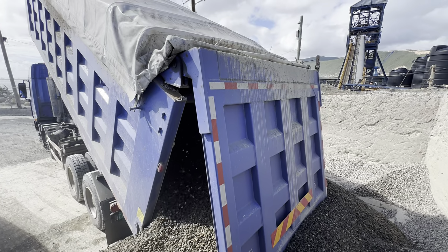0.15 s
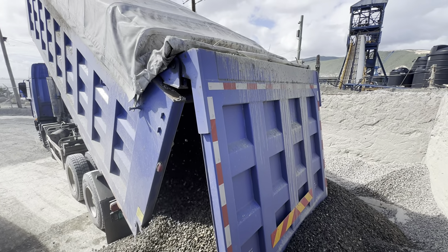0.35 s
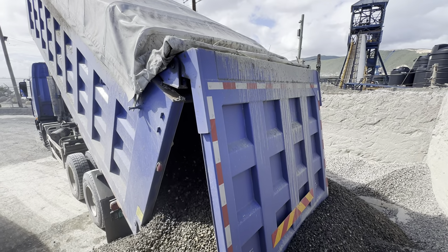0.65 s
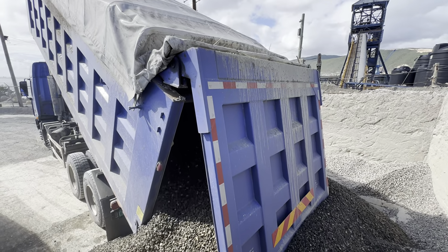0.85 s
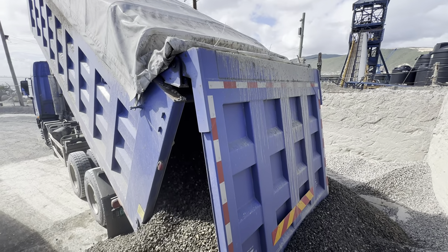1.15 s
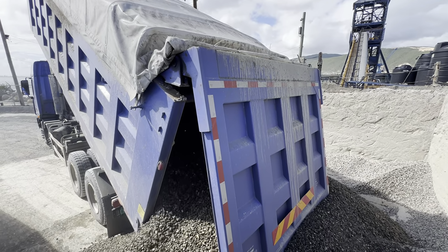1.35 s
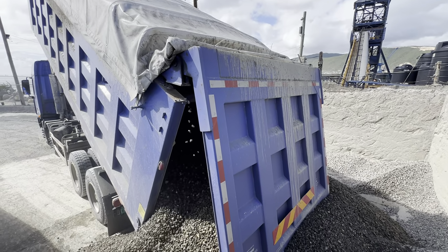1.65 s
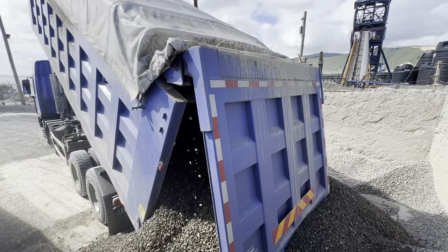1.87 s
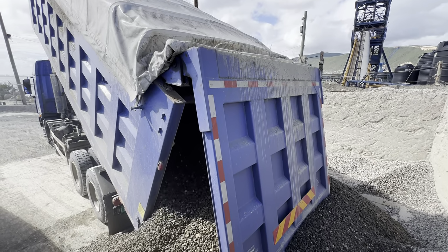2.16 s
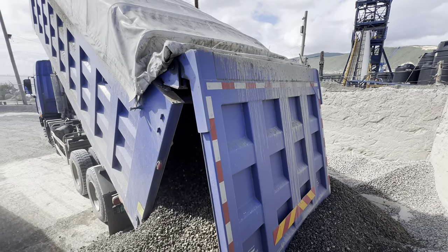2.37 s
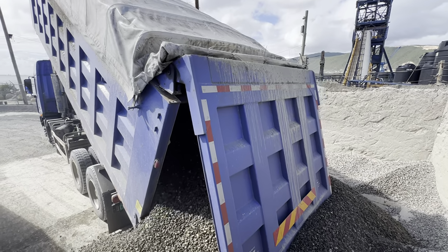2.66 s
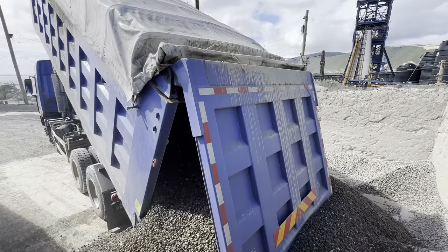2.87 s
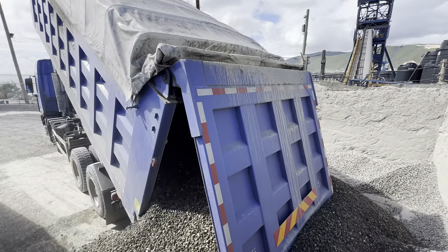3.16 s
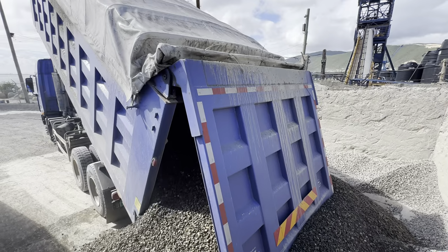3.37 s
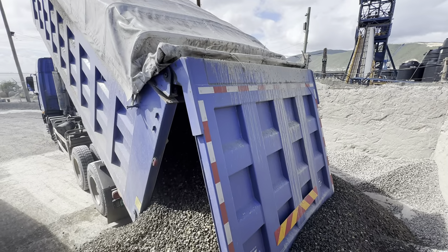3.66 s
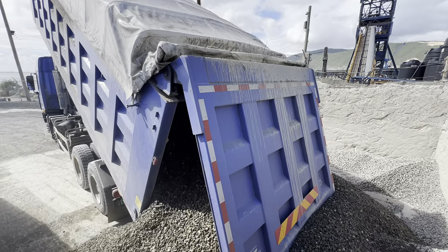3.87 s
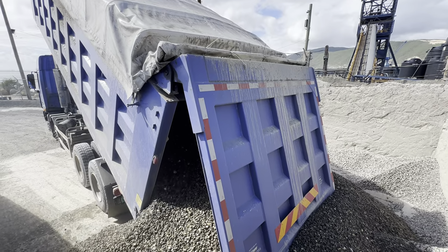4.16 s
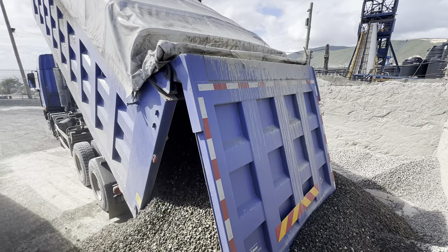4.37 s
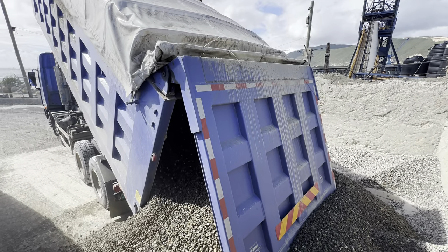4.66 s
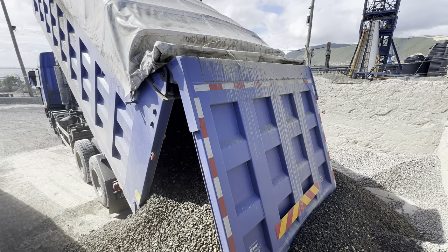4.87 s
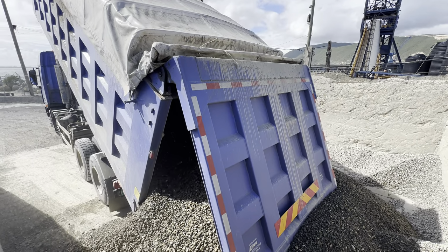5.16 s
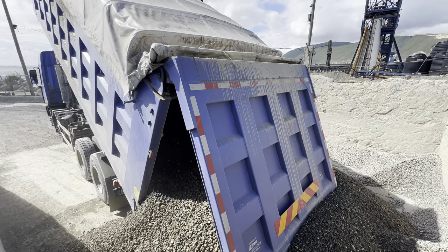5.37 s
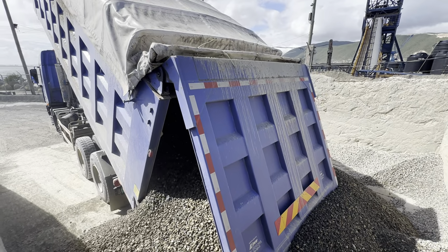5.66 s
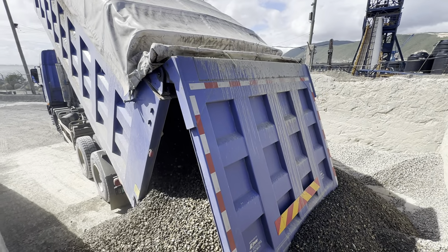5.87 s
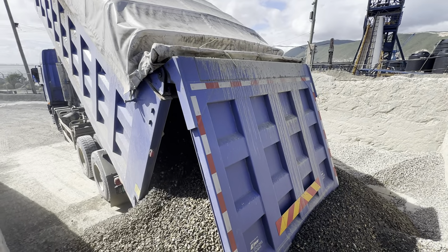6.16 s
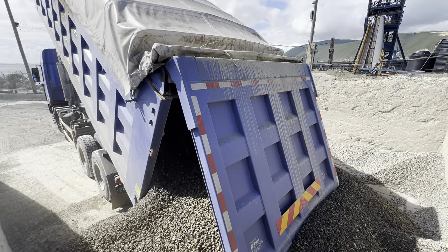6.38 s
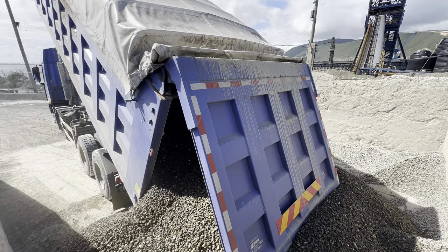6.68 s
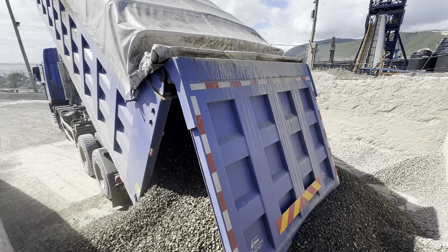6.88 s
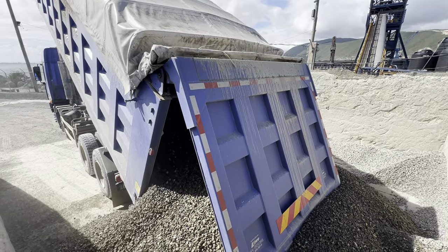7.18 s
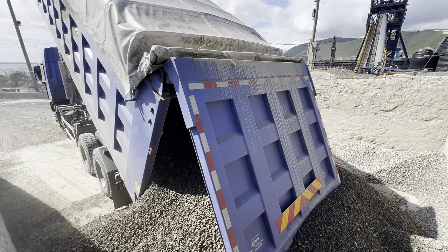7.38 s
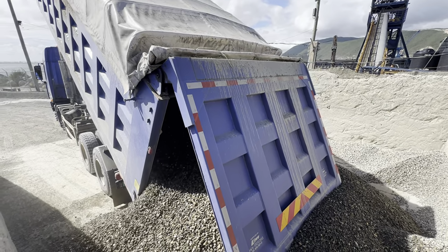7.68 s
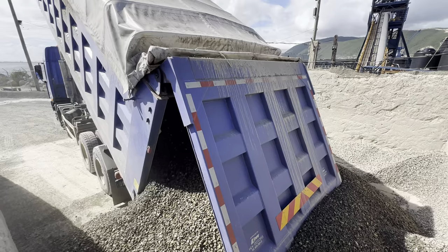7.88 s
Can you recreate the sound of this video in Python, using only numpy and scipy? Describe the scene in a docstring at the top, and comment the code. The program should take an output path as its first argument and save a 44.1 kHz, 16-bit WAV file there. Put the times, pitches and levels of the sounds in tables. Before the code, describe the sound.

Rough wind flutter, low thumps and sharp pops dominate, with a quieter gritty rush of gravel pouring from a steel tipper onto a heap.

```python
"""Gusty wind buffets the microphone: rough, crackling flutter, then a low thump, and single eddies crack sharply.
Behind it gravel slides out of a raised dump truck bed and rattles onto the heap under the open tailgate in an
open yard. Wind is shaped noise plus falling pressure jolts; gravel is dense random impacts, with gritty stone ticks
and pebble spatters. Stones knock on the steel bed, whose resonances drone faintly under the sliding load."""
import sys
import numpy as np
from scipy import signal
from scipy.fft import rfft, irfft, next_fast_len
from scipy.io import wavfile
from scipy.ndimage import uniform_filter1d, map_coordinates

SR = 44100
rng = np.random.default_rng(int(sys.argv[2]) if len(sys.argv) > 2 else 0)


def master_out(mix):
    """Clip the mix to full scale and print it as 16-bit PCM to the path in sys.argv[1]."""
    frames = np.transpose(np.atleast_2d(mix))
    ceiling = np.clip(frames, -1, 1)
    pcm = np.round(ceiling * 32767).astype(np.int16)
    wavfile.write(sys.argv[1], SR, pcm)


N = 354123
T = np.arange(N) / SR  # s

# Levels in the tables are relative; each source adds its own offset.
# steady breeze between gusts: t/s, strength/dB
BREEZE = [(0, -19.5), (.45, -21.5), (.63, -23), (1.08, -25), (1.3, -25.5), (1.6, -28), (1.84, -27.5),
          (2.07, -25.5), (2.52, -24), (2.69, -25.5), (3.1, -23), (3.26, -27), (3.43, -27), (4.3, -22),
          (4.66, -23.5), (4.94, -27), (5.26, -25.5), (5.49, -21), (6.45, -25.5), (6.74, -28), (7.1, -26),
          (7.28, -28), (7.57, -24.5), (8.03, -22.5)]
# gusts, each both flutters and rumbles: t/s, strength/dB, length/s, flutter over rumble/dB
GUSTS = [(0.054, -21, 0.05, 1.5), (0.093, -22, 0.016, -4), (0.158, -12, 0.022, -6), (0.303, -16, 0.045, -4),
         (0.397, -22.5, 0.088, 4), (0.473, -21.5, 0.064, 4.5), (0.528, -14, 0.016, -4),
         (0.703, -12.5, 0.038, -3), (0.802, -14.5, 0.054, -3.5), (1, -18, 0.051, -0.5),
         (1.108, -16.5, 0.012, -4), (1.166, -36, 0.018, -7), (1.235, -31, 0.049, 9),
         (1.272, -20.5, 0.036, -5), (1.35, -21.5, 0.064, -4), (1.579, -21, 0.033, -5),
         (2.086, -22, .05, -3), (2.202, -11.5, 0.024, -16), (2.34, -18, 0.066, -4.5),
         (2.42, -17, 0.054, -7), (2.481, -13.5, 0.037, -2), (2.533, -13, 0.021, -19),
         (2.788, -15.5, 0.032, -2.5), (2.858, -17.5, 0.029, 2), (2.894, -15.5, 0.041, -3),
         (2.996, -17.5, 0.032, -7), (3.052, -38, .05, -8), (3.156, -10, 0.041, -7.5),
         (3.324, -13, 0.047, -3), (3.387, -17, 0.045, 1.5), (3.46, -17, 0.09, -8),
         (3.597, -18.5, 0.064, -9), (3.64, -26, 0.04, 1), (3.752, -13, 0.0096, -22),
         (3.817, -16.5, 0.16, -6.5), (3.945, -14.5, 0.047, 1.5), (4.021, -25, 0.056, 4),
         (4.107, -24, 0.07, -12), (4.194, -16, 0.033, -4), (4.3, -15.5, 0.015, -22),
         (4.362, -12.5, 0.044, -4.5), (4.484, -33, 0.025, -1), (4.58, -20.5, 0.081, -1),
         (4.726, -13, 0.018, -13), (4.762, -23, 0.022, -7), (4.815, -18, 0.047, -4),
         (4.98, -20.5, 0.023, -3), (5.073, -33, 0.023, 1), (5.16, -26, 0.06, 1), (5.245, -25, 0.04, -22),
         (5.332, -17.5, 0.048, -3), (5.388, -21, 0.016, 2), (5.506, -18.5, 0.042, 0.5),
         (5.548, -18.5, 0.022, -2), (5.587, -16.5, 0.028, -2), (5.631, -23, 0.015, 4),
         (5.696, -21, 0.038, 1.5), (5.74, -17, 0.025, -4.5), (5.78, -15.5, 0.017, -12),
         (5.839, -27, 0.023, 5), (5.9, -19.5, 0.014, -4), (5.941, -15, 0.067, -3), (6.012, -19, 0.049, 2),
         (6.095, -10, 0.017, -10), (6.204, -20, 0.041, -6), (6.244, -17, 0.012, -2),
         (6.302, -21.5, 0.071, -4), (6.377, -15.5, 0.024, -3), (6.441, -13, 0.0091, -4.5),
         (6.537, -26.5, 0.068, 5.5), (6.624, -22, 0.024, -18), (6.85, -25.5, 0.08, 1.5),
         (6.973, -24, 0.04, -0.5), (7.081, -20, 0.092, -1.5), (7.183, -25, 0.031, 5),
         (7.353, -23, 0.035, -0.5), (7.41, -25, 0.049, -1), (7.478, -21.5, 0.031, 1),
         (7.548, -20, 0.05, -9.5), (7.608, -16, 0.031, -6), (7.688, -23, 0.038, 6), (7.759, -21, 0.039, 6),
         (7.823, -20, 0.018, -6), (7.959, -12, 0.016, -13)]
# sharp wind cracks: t/s, level/dB, left over right at onset/dB, starting pitch above the end pitch f/Hz
CRACKS = [(0.0098, -9.0, 8, 2900), (0.0477, -9.0, 14, 4200), (0.0716, -4.0, -2, 2400),
          (0.11, -6.0, 14, 1900), (0.1589, -5.5, 11, 6000), (0.1709, -6.5, -14, 1600),
          (0.2871, -1.5, 14, 2100), (0.4134, -7.5, 1, 2100), (0.4702, -6.0, -4, 3100),
          (0.4812, -3.0, 8, 2400), (0.4892, -2.0, -6, 1500), (0.5281, -8.0, 14, 6300),
          (0.6887, -7.5, 2, 1500), (0.7007, -2.0, 13, 1900), (0.7187, -6.5, -2, 2900),
          (0.8025, -4.0, -4, 2200), (0.9397, -8.5, 10, 3100), (0.9445, -12, 6, 3100),
          (1.011, -9.0, 11, 3300), (1.1991, -10.0, 14, 2100), (1.2754, -9.0, 14, 2100),
          (1.4804, -6.0, 9, 1400), (1.5223, -5.0, 5, 2900), (2.0197, -13.0, 12, 2400),
          (2.1948, -8.0, 14, 1300), (2.3315, -6.0, -14, 2400), (2.35, -6.5, 14, 2900),
          (2.3745, -10.0, 6, 2400), (2.3993, -6.5, 14, 2900), (2.4832, -4.0, -7, 1500),
          (2.539, -6.0, 14, 3300), (2.7835, -2.0, -14, 1100), (2.7969, -7.5, -8, 2200),
          (2.8493, -5.0, -8, 2400), (2.8723, -5.0, -14, 1600), (2.9296, -8.0, 14, 1900),
          (3.1631, -4.5, 8, 3100), (3.1776, -3.5, 14, 1300), (3.3217, -4.5, -4, 2400),
          (3.3547, -4.5, -7, 1900), (3.3651, -5.5, 11, 2400), (3.3946, 0.0, -10, 1800),
          (3.5043, -9.5, 14, 3300), (3.5961, -10.0, 4, 1800), (3.64, -10.5, 14, 2600),
          (3.7987, -7.5, 4, 2100), (3.8431, -8.0, 12, 1800), (3.9349, 0.0, -6, 2200),
          (3.9448, -7.5, -10, 1900), (3.9608, -3.5, 6, 1600), (4.1385, -10.5, 2, 2400),
          (4.2055, -9.0, -5, 3100), (4.4946, -10.5, 12, 2200), (4.6527, -7.5, 14, 1100),
          (4.7271, -9.5, -2, 1100), (4.8165, -7.0, 6, 1400), (4.8363, -7.0, 14, 2600),
          (5.0044, -13.0, 14, 2400), (5.1965, -9.5, 14, 1900), (5.3382, -11.5, -14, 3600),
          (5.3461, -6.0, 11, 2900), (5.5482, -5.0, 11, 1800), (5.5846, -4.0, 12, 1900),
          (5.6315, -7.5, 13, 2200), (5.6978, -6.0, -7, 2400), (5.8325, -7.5, 8, 1600),
          (5.9014, -8.5, 13, 2900), (5.9293, -5.5, 11, 2900), (5.9383, -8.0, -4, 1400),
          (6.0047, -7.0, 10, 1800), (6.0161, -4.0, 5, 1300), (6.055, -6.5, 14, 2100),
          (6.1982, -9.5, 7, 1100), (6.2401, -10.0, -4, 1800), (6.274, -10.0, -9, 2600),
          (6.3265, -10.0, 0, 1300), (6.3683, -8.0, 14, 1900), (6.3938, -6.5, 14, 1900),
          (6.4222, -11.5, 11, 2900), (6.4801, -11.5, -2, 2600), (6.4871, -13.5, 14, 3100),
          (6.5414, -7.0, -11, 1300), (6.573, -11.0, -10, 2900), (6.6761, -9.0, 13, 2400),
          (6.8822, -10.0, 9, 2400), (6.9769, -8.0, 13, 3600), (7.1755, -7.0, 14, 1500),
          (7.2049, -9.5, 14, 1500), (7.3676, -12.5, 14, 2600), (7.4763, -6.0, 7, 1600),
          (7.4868, -6.0, -8, 2400), (7.6798, -5.5, 4, 1500), (7.7285, -8.5, 10, 2600),
          (7.7507, -1.5, -5, 2900), (7.9492, -7.5, 14, 1500), (8.002, -13.5, -12, 3600)]
# wind rumble spectrum: f/Hz, level/dB
RUMBLE_SPECTRUM = [(15, -44), (30, -18), (45, -4.5), (68, 1.5), (100, -3), (160, -7), (250, -13),
                   (400, -21.5), (900, -71)]
# wind flutter spectrum: f/Hz, level/dB
FLUTTER_SPECTRUM = [(100, -60), (250, -4.5), (450, -1), (800, -1.5), (1200, -5.5), (2000, -13), (3000, -19),
                    (5000, -32.5), (12000, -60)]
# colour of the small jolts in the flutter: f/Hz, gain/dB
CRACKLE_SPECTRUM = [(100, -17), (300, 0), (550, 0), (1400, 1.5), (2500, 2.5), (5000, -8)]
# colour of grinding and rattling gravel: f/Hz, level/dB
GRAVEL_SPECTRUM = [(300, 13.5), (900, 2.5), (1800, 3.5), (2800, 2.5), (4200, 0.5), (6000, 1.5),
                   (7400, -2.5), (9700, 2), (11000, -7.5), (16000, -7)]
# stereo place of the gravel by frequency: f/Hz, left over right/dB
GRAVEL_SIDE = [(1000, -2.5), (2700, -4), (4200, 2), (6200, 8), (8000, 7), (10000, -3), (15000, -1)]
# spectrum of the thin high hiss: f/Hz, level/dB
HISS_SPECTRUM = [(5000, -28), (10000, -45), (12500, 17), (14000, 9), (16000, 8)]
# level of the faint top hiss over time: t/s, level/dB
HISS_LEVEL = [(0, -47), (1.1, -46.5), (1.94, -41), (2.42, -50), (6.1, -49), (6.6, -45.5), (8.03, -52)]
# single hard stone strikes: t/s, level/dB, band centre f/Hz, left over right/dB
STONES = [(0.18, -14.5, 9000, 3), (.571, -19, 13500, 0), (1.335, -16.5, 6100, -2), (1.655, -18, 2600, -6),
          (1.709, -20, 1700, 5), (1.729, -25, 2600, -8), (1.883, -16.5, 2400, -2), (1.91, -21, 13100, 0),
          (1.977, -18, 13500, 2), (2.097, -22, 9500, 0), (2.206, -25, 7600, 2), (2.474, -13, 5500, 7.5),
          (5.929, -24, 5370, 12)]
# handfuls of pebbles: t/s, level/dB, length/s
SPATTERS = [(.03, -27, 0.028), (.27, -26, 0.014), (.34, -28, .033), (.625, -27, 0.04), (.792, -25.5, 0.04),
            (.845, -28.5, 0.018), (1.355, -31.5, .05), (1.432, -31, 0.017), (2.98, -28, 0.022),
            (3.05, -34.5, 0.062), (3.37, -30, 0.046), (3.615, -30, 0.025), (3.81, -30.5, 0.14),
            (4.25, -33.5, 0.22), (6.27, -52, 0.09), (6.42, -38, 0.15), (7.18, -36, .06), (7.365, -36, .04)]
# skittering pebble spectrum: f/Hz, level/dB
SPATTER_SPECTRUM = [(1200, 8.5), (2800, 13), (4200, 7), (6000, 5.5), (8500, -1.5), (12000, -31)]
# resonances of the steel bed, each passed twice: f/Hz, width of one pass/Hz, level/dB
BED_MODES = [(1056, 100, -5), (1600, 310, -5), (1870, 180, -9)]
# rattle of the load over the steel floor: t/s, level/dB
SLIDE = [(0, -31.5), (1.3, -34.5), (1.75, -35), (2.3, -33.5), (3, -31.5), (5, -51), (6.2, -42.5),
         (8.03, -34.5)]
# likeness of the two microphone ports: f/Hz, correlation/0-1
PORT_LIKENESS = [(400, .55), (640, .33), (950, .4), (1400, .18), (7500, .15), (9500, .65), (11000, .93),
                 (12700, .58), (14500, .8), (16000, .55)]
# phase between the ports: f/Hz, left lead/rad
PORT_LEAD = [(60, 0), (180, -.15), (290, -.85), (400, -1.7), (700, -3.3), (1050, -4.6), (2500, -2.8),
             (4300, 0), (8300, 0), (9800, -1.3), (10600, -3), (11800, -3.3), (13700, -6.2)]
# bass drawn to the centre: t/s, corner of the left-right difference f/Hz
MONO_BELOW = [(0, 15), (1.95, 15), (2.15, 190), (2.7, 310), (5.8, 320), (6.4, 185), (7.15, 140),
              (7.75, 340)]

FLUTTER_DB, FLUTTER_GROWTH_DB_PER_DB = -3, 1  # breeze flutter over a mean breeze; gain per dB of wind
CRACKLE_DB = -1.5  # small jolts against the flutter's rush
EDDY_RATE_HZ, EDDY_DB = 40, 2.0  # chance eddies shared by rumble and flutter: knots per second, swing
LUMPY_DB = 1.7  # swing of rumble and flutter each on its own
THUMP_LAG_S = 0.0073  # thump after flutter
POUR_DB, EASE_DB_PER_S = -38.5, 0.3355  # the pour eases off as the heap grows
TOP_HZ = 15950


def rumble(eddy, gust_db=2.0, knock_db=-10, rough_db=2.0):
    """Large eddies press on the ports; a higher, rougher knock follows their swells, more gently than the body."""
    breeze_db, = curves(BREEZE)
    breeze = amp(breeze_db + EDDY_DB * eddy + LUMPY_DB * wobble(45))
    thumps = [(s + THUMP_LAG_S, db + gust_db, length_s) for s, db, length_s, _ in GUSTS]
    level = np.sqrt(breeze ** 2 + swells(thumps, rise=0.77, fall=0.86))
    body = level * evened(ports(noise(), RUMBLE_SPECTRUM), window_s=0.068)
    knock_level = unit(level ** 0.69 * amp(rough_db * wobble(90)))
    knock_spectrum = [(70, 5), (140, 7.0), (230, -1.5), (380, -5.0), (800, -54.0)]
    knocks = knock_level * evened(ports(noise(), knock_spectrum), window_s=0.037)
    return body + amp(knock_db) * np.std(body) * knocks


def flutter(eddy, gust_db=-1.5, tearing_db=3, spit_db=-24, calm_db=-34):
    """Small eddies of mixed sizes tear at the ports in ragged, crackling bursts, with a faint high spit on top."""
    wind_db, = curves(BREEZE)
    mean_db = wind_db.mean()
    breeze_db = mean_db + FLUTTER_DB + FLUTTER_GROWTH_DB_PER_DB * (wind_db - mean_db)
    breeze = amp(breeze_db + EDDY_DB * eddy + LUMPY_DB * wobble(50))
    breeze = breeze ** 3 / (breeze ** 2 + amp(calm_db) ** 2)  # a weak breeze slips past smoothly
    bursts = [(s, db + over_db + gust_db, length_s) for s, db, length_s, over_db in GUSTS]
    level = np.sqrt(breeze ** 2 + swells(bursts, rise=0.81, fall=1.0))

    tearing = unit(amp(tearing_db * np.array([wobble(170), wobble(170)])))
    rush = unit(ports(patchy(depth_db=6.5, size=512), FLUTTER_SPECTRUM) * tearing)
    body = level * evened(unit(rush + amp(CRACKLE_DB) * crackle()), window_s=0.12)
    spit_spectrum = [(700, -11), (1800, 23), (3000, -11), (5000, -25), (12000, -32)]
    spit = unit(level * tearing) * ports(patchy(depth_db=1), spit_spectrum)
    return body + amp(spit_db) * np.std(body) * spit


def crackle(rate_hz=42, spread_db=1.6, dull_hz=900, bright_hz=2800, t60_s=.012, sizes=6):
    """An uneven patter of small jolts of several sizes, dull to bright, each at one port only; rms 1."""
    patter = np.zeros((2, N))
    for hz in np.geomspace(dull_hz, bright_hz, sizes):
        patter += signal.oaconvolve(impacts(rate_hz, spread_db), jolt(hz, t60_s)[None], axes=1)[:, :N]
    return unit(filtered(patter, lambda hz: amp(along(CRACKLE_SPECTRUM, hz))))


def cracks(level_db=-.3, t60_s=.05, spread_s=.012, grit=.2,
           after_db=-9.5, after_scale_s=.012, after_top_hz=2600, after_count=2):
    """An eddy breaks nearer one port, weaker, duller jolts tumble after it, and the low swing reaches both."""
    out = np.zeros((2, N))
    for s, db, side_db, start_hz in CRACKS:
        jolts = [(0.00017, 0.0065, start_hz)]  # delay/s, gain/dB, f/Hz
        for late, small in rng.random((after_count, 2)):
            after_hz = min(start_hz, after_top_hz) * (.5 + .5 * small)
            jolts.append((after_scale_s * (.25 + late), after_db, after_hz))
        for delay_s, gain_db, hz in jolts:
            wave = jolt(hz, t60_s) * rng.choice([-1, 1])
            ragged = 1 + grit * unit(uniform_filter1d(rng.standard_normal(len(wave)), size=24))
            far_port_db = np.minimum(side_db * np.array([[1], [-1]]), 0)
            shade_db = far_port_db * np.exp(-T[:len(wave)] / spread_s)
            add(out, s + delay_s, amp(level_db + db + gain_db + shade_db) * wave * ragged)
    return staggered(out)


def jolt(start_hz, t60_s, sweep=.007, end_hz=80, snap=1.5, swing=.1, attack_cycles=.45):
    """A pressure jolt: a sharp head, then the pitch falls into a low swing; small eddies have shorter heads."""
    t = T[:SR // 10]
    head_s = np.sqrt(sweep / start_hz)
    cycles = end_hz * t + sweep * (1 / head_s - 1 / (t + head_s))  # pitch falls from end_hz + start_hz
    fade = (1 - swing) * np.exp(-t / (snap * head_s)) + swing * amp(-60 * t / t60_s)
    attack = 1 - np.exp(-t * start_hz / attack_cycles)
    return np.sin(2 * np.pi * cycles) * fade * attack


def gravel(rush_db=7.0, rattle_db=-4.0, hiss_gain_db=3):
    """Countless stones grind into a rush, nearer ones rattle, and a thin high hiss lies on top."""
    flow_db = POUR_DB - EASE_DB_PER_S * T
    rush_level = amp(flow_db + rush_db + 0.077 * wobble(14.0))
    rush = rush_level * ports(impacts(rate_hz=14000, spread_db=1.5), GRAVEL_SPECTRUM)

    clacks = impacts(rate_hz=700, spread_db=6.0)
    t = T[:SR // 100]
    chatter = rng.standard_normal((2, len(t))) * amp(-60 * t / 0.014)  # short decaying noise per stone
    clatter = signal.fftconvolve(clacks, chatter, axes=1)[:, :N]
    rattle = amp(flow_db + rattle_db + 5.0 * wobble(12)) * ports(clatter, GRAVEL_SPECTRUM)

    hiss_db, = curves(HISS_LEVEL)
    hiss = amp(hiss_db + hiss_gain_db) * ports(impacts(rate_hz=16000, spread_db=4.0), HISS_SPECTRUM)
    return hiss + filtered(rush + rattle, lambda hz: panned(along(GRAVEL_SIDE, hz)))


def stones(level_db=-7.0, t60_s=0.027, log_width=0.25):
    """Stray stones strike with a short gritty tick: decaying noise in a band around their pitch."""
    out, t = np.zeros((2, N)), T[:SR // 20]
    hz = np.fft.rfftfreq(len(t), 1 / SR)
    for s, db, pitch_hz, side_db in STONES:
        band = np.exp(-.5 * (np.log((hz + 1) / pitch_hz) / log_width) ** 2)
        tick = unit(irfft(rfft(rng.standard_normal((2, len(t)))) * band, len(t)))
        add(out, s, amp(db + level_db - 60 * t / t60_s) * panned(side_db) * tick)
    return out


def spatters(level_db=-1, side_db=-6):
    """Handfuls of pebbles spatter out to the right: swells of random impacts."""
    pebbles = ports(impacts(rate_hz=1500, spread_db=3.5), SPATTER_SPECTRUM)
    return amp(level_db) * np.sqrt(swells(SPATTERS)) * panned(side_db) * pebbles


def bed(drone_db=-46, knock_t30_s=0.011):
    """The sliding load keeps the steel bed's resonances humming, and larger stones knock on it."""
    def steel(f):
        response = 0
        for mode_hz, width_hz, db in BED_MODES:
            loss = 1j * f * width_hz
            response = response + amp(db) * (loss / (mode_hz * mode_hz - f * f + loss)) ** 2
        return response

    drone = amp(drone_db + 1.3 * wobble(5.4)) * unit(filtered(noise(), steel))
    t = T[:SR // 20]
    power_decay = amp(-60 * t / knock_t30_s)[None]  # 30 dB of power per knock_t30_s: the load damps each ring
    hits = impacts(rate_hz=110, spread_db=2.8)
    power = signal.fftconvolve(hits ** 2, power_decay, axes=1)[:, :N]
    knocks = np.sqrt(np.abs(power)) * noise()
    knock_spectrum = [(400, -24), (1000, 5.0), (1800, 4.5), (2800, -5.5), (5000, -18.5), (10000, -45)]
    slide_db, = curves(SLIDE)
    return drone + amp(slide_db) * ports(knocks, knock_spectrum)


def ports(pair, spectrum):
    """Colour two unrelated signals and blend them as the two microphone ports hear them, rms 1."""
    m = next_fast_len(N + SR // 4)
    hz = np.fft.rfftfreq(m, 1 / SR)
    a, b = rfft(pair, m) * amp(along(spectrum, hz))
    turn = np.arccos(np.clip(along(PORT_LIKENESS, hz), 0, 1)) / 2
    mid, side = a * np.cos(turn), b * np.sin(turn)
    lead = np.exp(.5j * along(PORT_LEAD, hz))
    return unit(irfft([(mid + side) * lead, (mid - side) / lead], m)[:, :N])


def staggered(x):
    """Shift the phase between the ports, frequency by frequency."""
    return filtered(x, lambda hz: np.exp(np.array([[.5j], [-.5j]]) * along(PORT_LEAD, hz)))


def swells(rows, rise=0.84, fall=0.75):
    """Bell-shaped swells of power with separate rise and fall, one for each (t/s, level/dB, length/s)."""
    power = np.zeros(N)
    for s, db, length_s in rows:
        near = slice(max(int(s * SR) - SR // 8, 0), int(s * SR) + SR // 8)
        u = 2 * (T[near] - s) / length_s
        power[near] += amp(db) ** 2 * .5 ** ((u / np.where(u < 0, rise, fall)) ** 2)
    return power


def impacts(rate_hz, spread_db):
    """Random collisions at a mean rate in each channel: many faint, few hard."""
    hit = rng.random((2, N)) < rate_hz / SR
    return hit * np.sign(noise()) * amp(spread_db * np.minimum(rng.exponential(size=(2, N)), 4))


def patchy(depth_db, size=256):
    """Two noises broken into clumps some milliseconds long and some hundred Hz wide."""
    z = signal.stft(noise(), nperseg=size)[2]
    field = uniform_filter1d(rng.standard_normal(z.shape), size=4, axis=1)  # across frequency
    field = uniform_filter1d(field, size=3, axis=2)  # across time
    return signal.istft(z * amp(depth_db * unit(field)), nperseg=size)[1][:, :N]


def evened(x, window_s):
    """Hold a stereo noise near a steady level, keeping its shorter detail."""
    power = uniform_filter1d(np.mean(x ** 2, axis=0), max(int(window_s * SR), 2))
    power = uniform_filter1d(power, max(int(window_s * SR / 2), 2))
    return x / np.sqrt(np.abs(power) + 0.0009)


def noise():
    """Two unrelated white noises."""
    return rng.standard_normal((2, N))


def wobble(rate_hz):
    """A smooth random curve, rate_hz knots per second."""
    knots = rng.standard_normal(int(N * rate_hz / SR) + 4)
    return map_coordinates(knots, [T * rate_hz], mode="nearest")


def amp(db):
    """Decibels to gain."""
    return 10 ** (np.asarray(db) / 20)


def unit(x):
    """Scale to rms 1."""
    return x / np.sqrt(np.mean(x ** 2) + 1e-20)


def along(points, hz):
    """(f/Hz, value) points read on a log frequency axis."""
    f, v = np.transpose(points)
    return np.interp(np.log(hz + 1), np.log(f + 1), v)


def curves(rows):
    """One value per sample for each column after the time."""
    s, *cols = np.transpose(rows)
    return [np.interp(T, s, c) for c in cols]


def filtered(x, response):
    """Apply a frequency response."""
    m = next_fast_len(N + SR // 4)
    return irfft(rfft(x, m) * response(np.fft.rfftfreq(m, 1 / SR)), m)[..., :N]


def panned(side_db):
    """Left and right gains for a left-over-right level difference."""
    return amp(np.array([[.5], [-.5]]) * side_db)


def add(track, s, sound):
    """Mix a stereo sound into the track at time s."""
    part = track[:, max(round(s * SR), 0):][:, :sound.shape[1]]
    part += sound[:, :part.shape[1]]


def centred(x, order=6):
    """The left-right difference loses its bass below a moving corner."""
    hz, t, z = signal.stft((x[0] - x[1]) / 2, SR, nperseg=1024)
    corner_hz = np.interp(t, *np.transpose(MONO_BELOW))
    keep = 1 / np.sqrt(1 + (corner_hz / (hz[:, None] + 1)) ** (2 * order))
    side = signal.istft(z * keep, SR, nperseg=1024)[1][:N]
    return x.mean(axis=0) + np.array([side, -side])


def scene():
    """The pouring load behind the wind on the microphone."""
    eddy = wobble(EDDY_RATE_HZ)
    wind = rumble(eddy) + flutter(eddy) + cracks()
    load = gravel() + stones() + spatters() + bed()
    return wind + load


def record(dry, low_cut_hz=31, ceiling=.92):
    """Low cut, bass drawn to the centre, peaks rounded off below full scale, top cut."""
    low_cut = filtered(dry, lambda hz: hz ** 4 / np.sqrt(hz ** 8 + low_cut_hz ** 8))
    narrow = centred(low_cut)
    rounded = narrow / (1 + np.abs(narrow / ceiling) ** 8) ** (1 / 8)
    return filtered(rounded, lambda hz: hz < TOP_HZ)


dry = scene()
out = record(dry)
master_out(out)
```